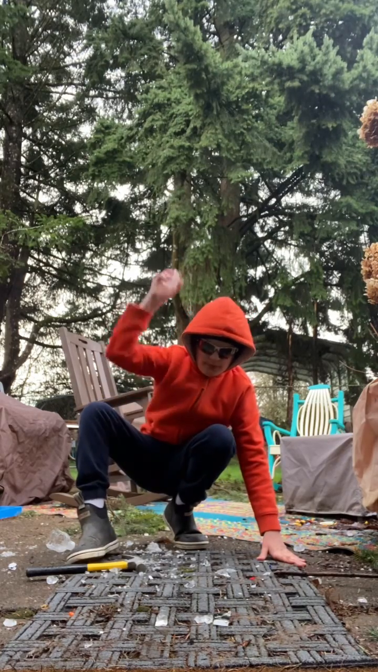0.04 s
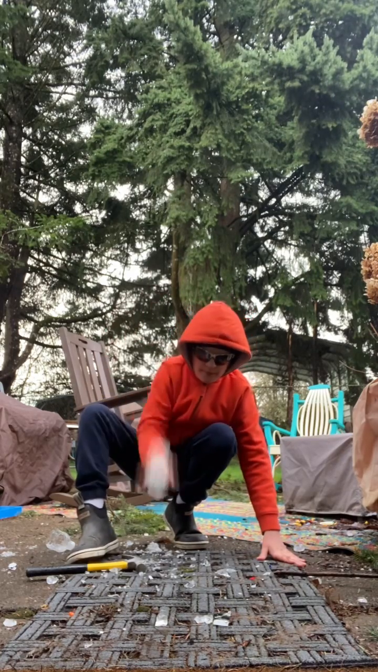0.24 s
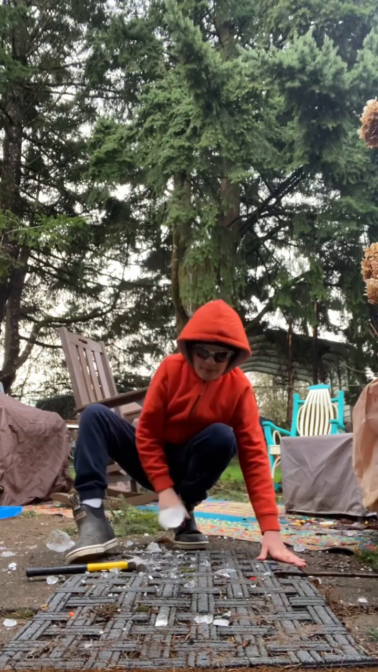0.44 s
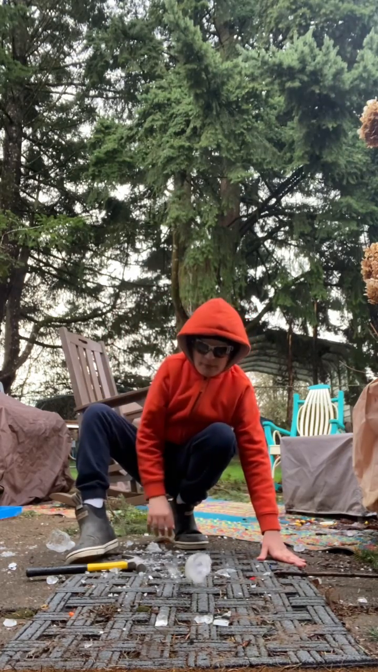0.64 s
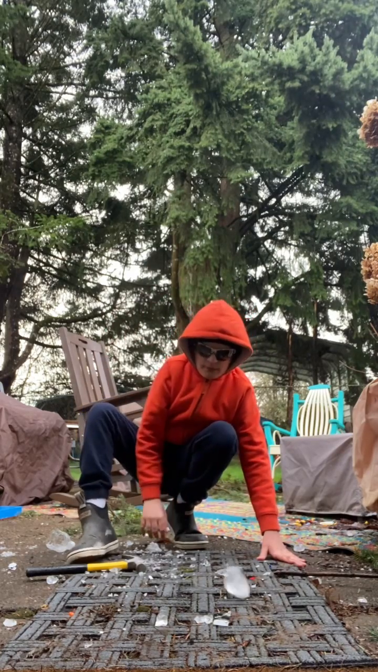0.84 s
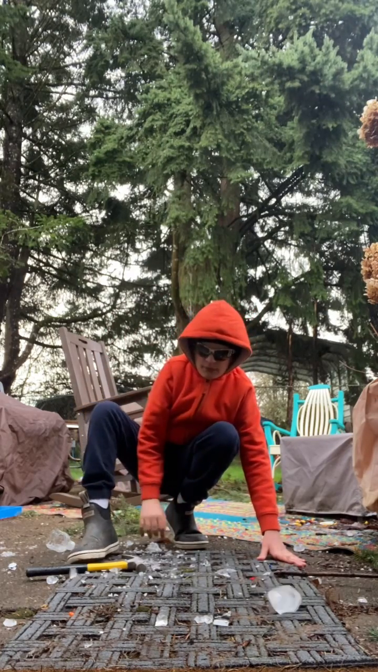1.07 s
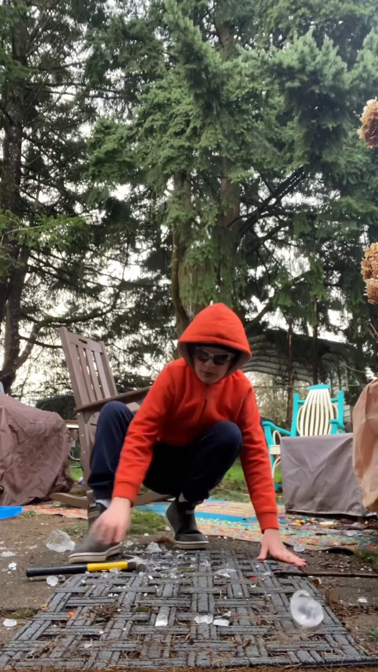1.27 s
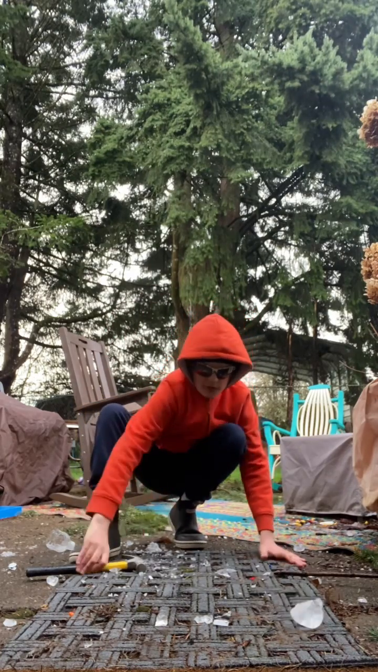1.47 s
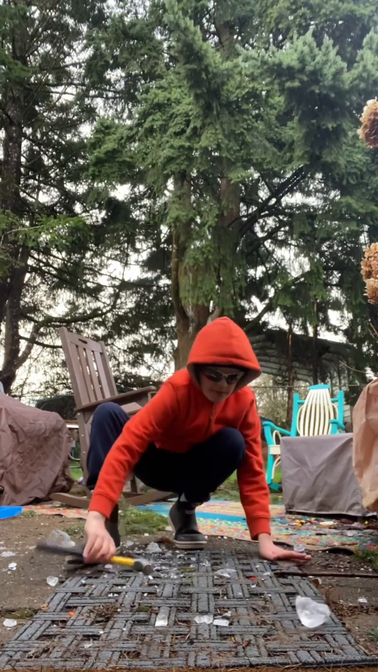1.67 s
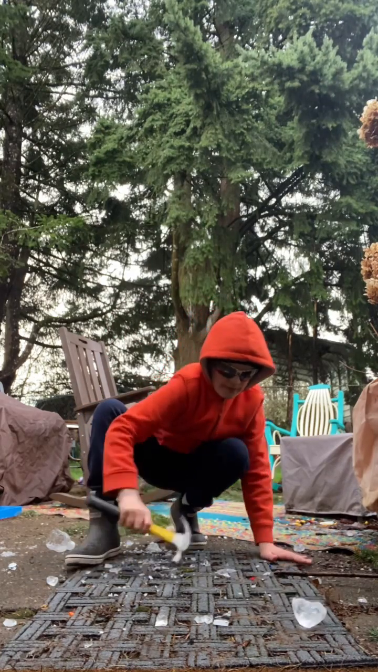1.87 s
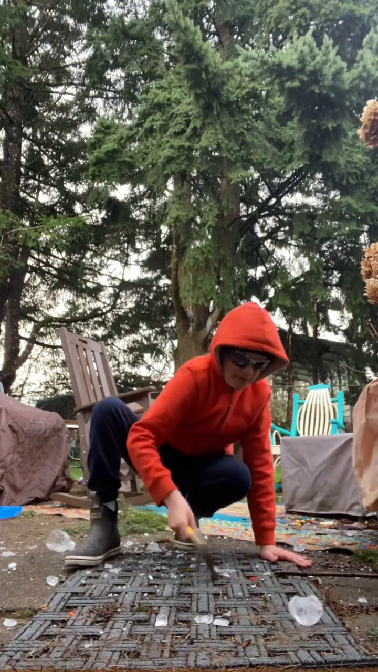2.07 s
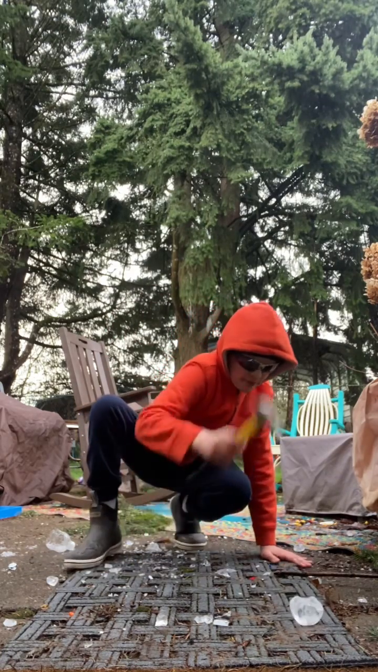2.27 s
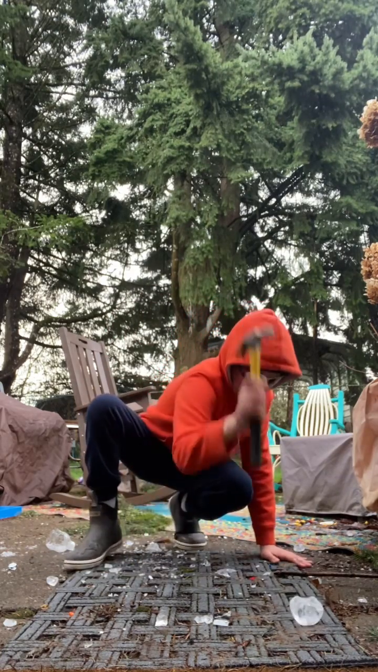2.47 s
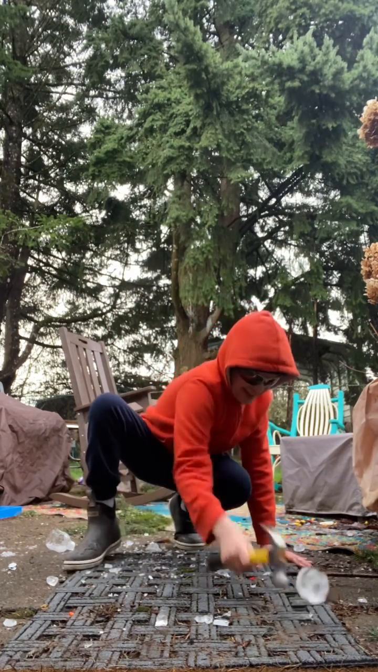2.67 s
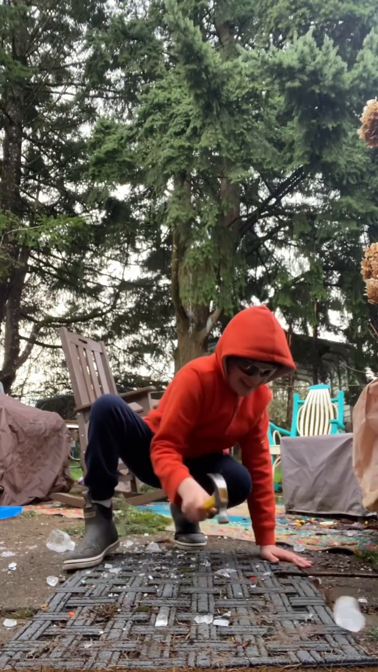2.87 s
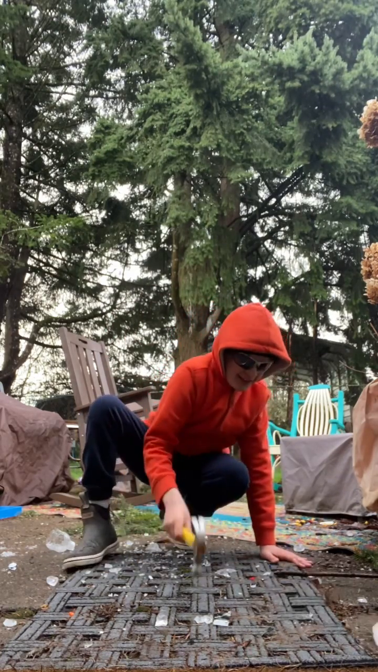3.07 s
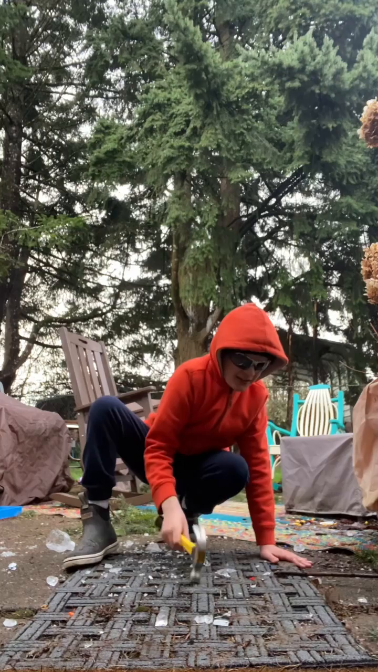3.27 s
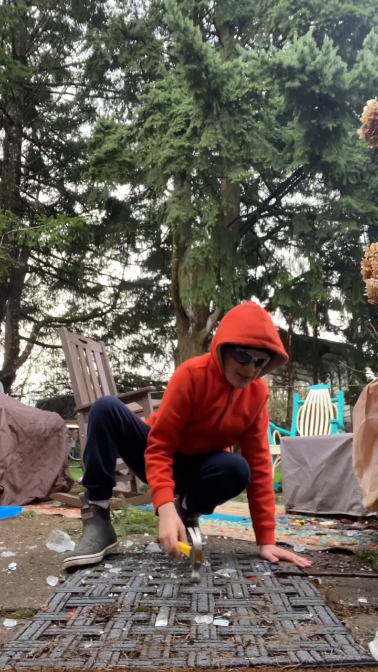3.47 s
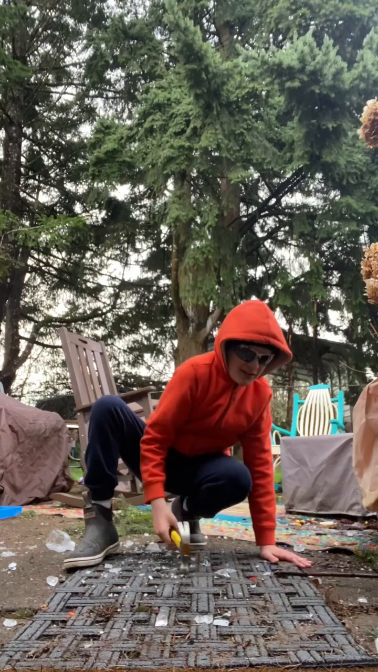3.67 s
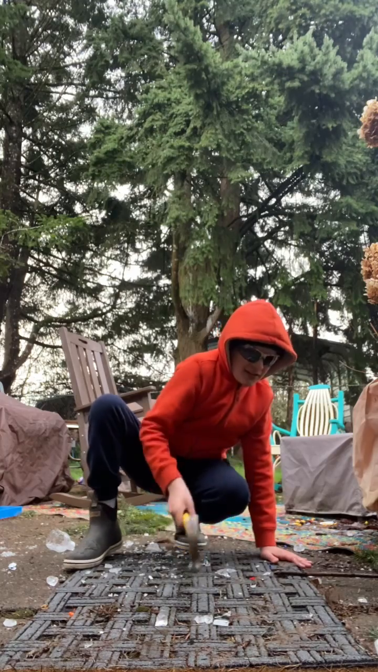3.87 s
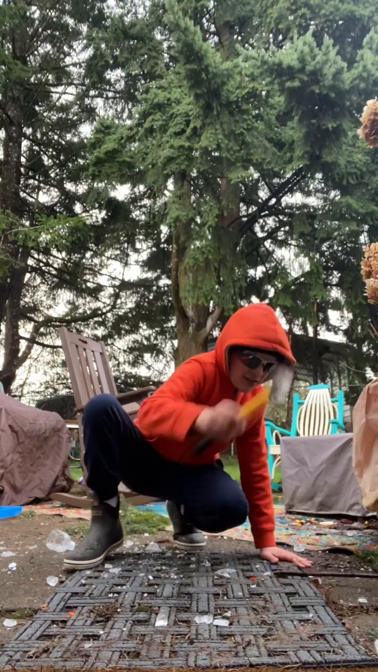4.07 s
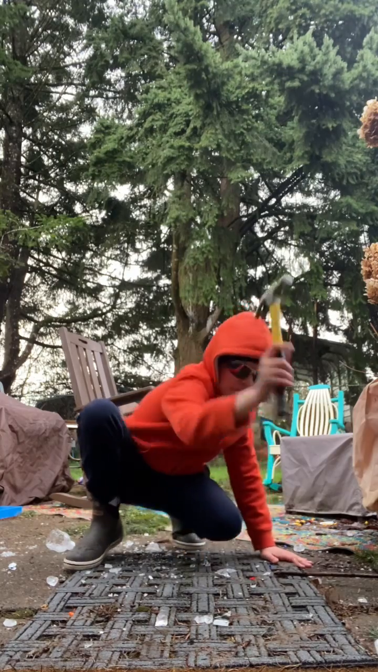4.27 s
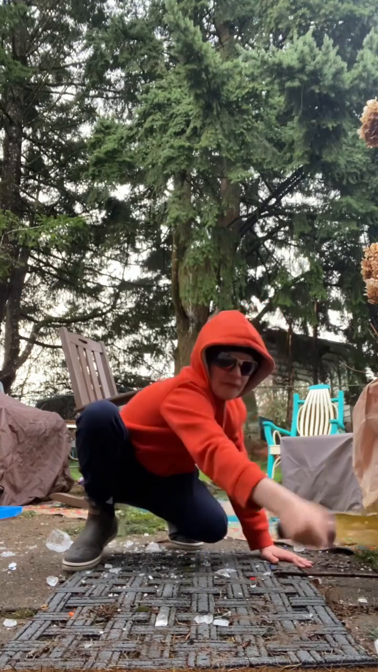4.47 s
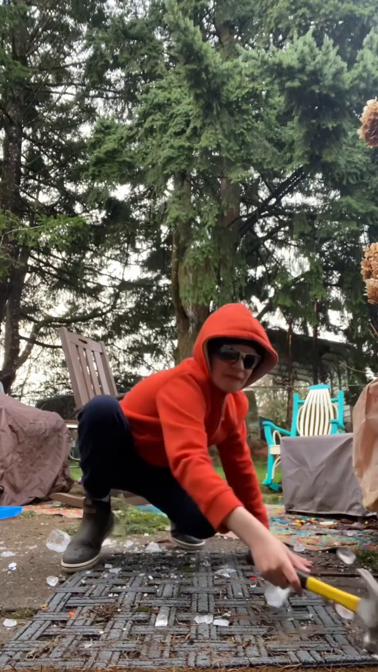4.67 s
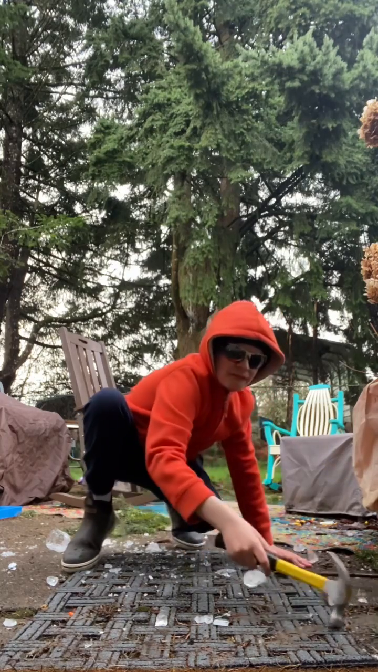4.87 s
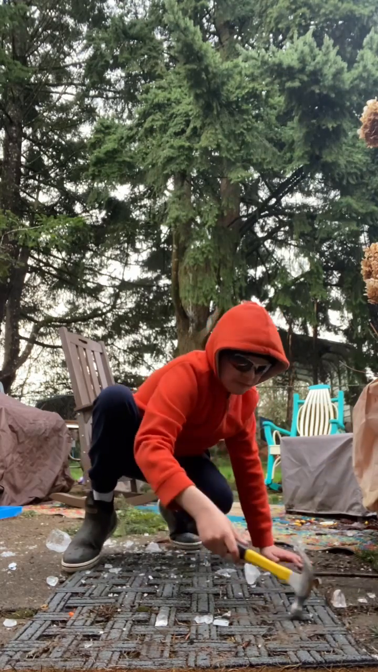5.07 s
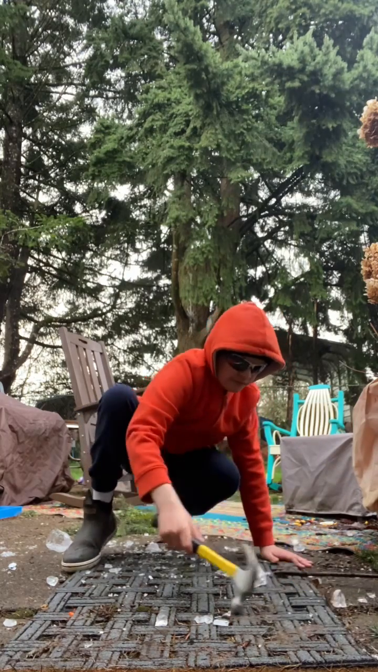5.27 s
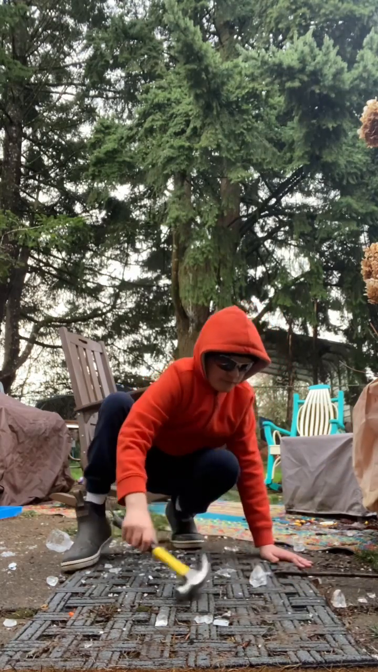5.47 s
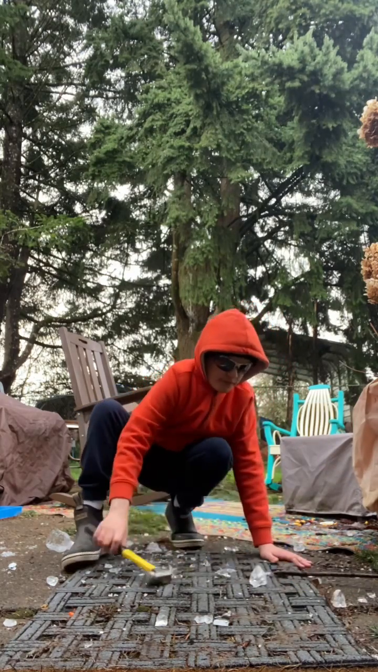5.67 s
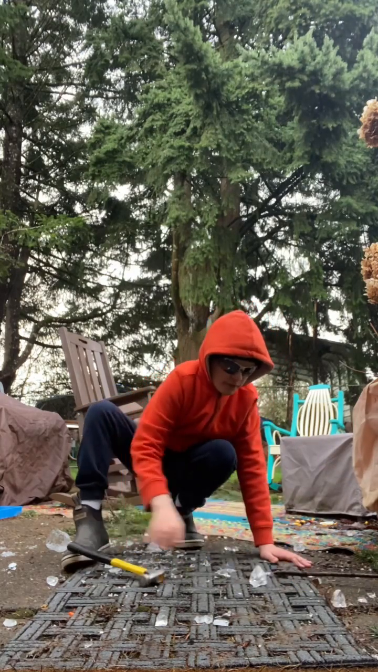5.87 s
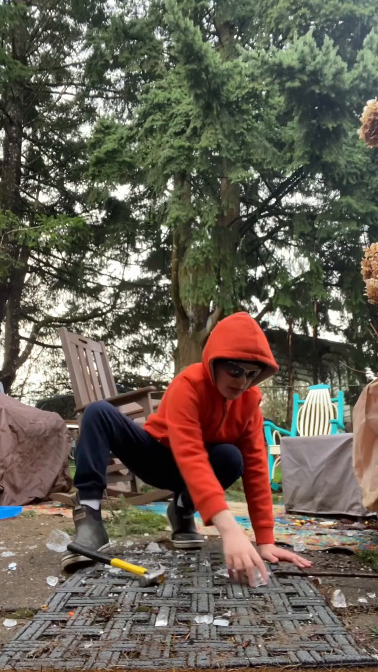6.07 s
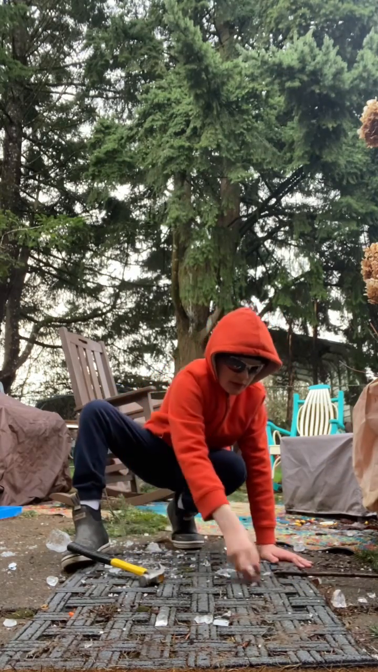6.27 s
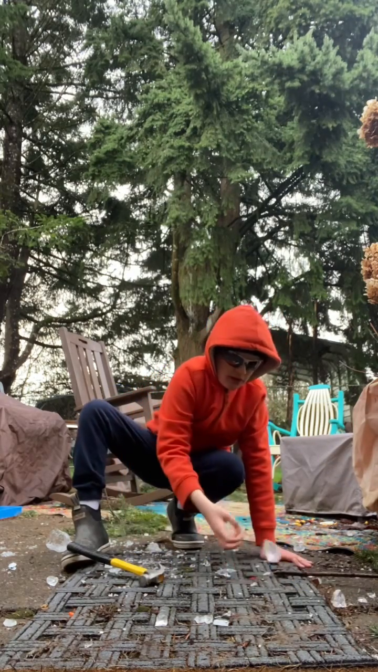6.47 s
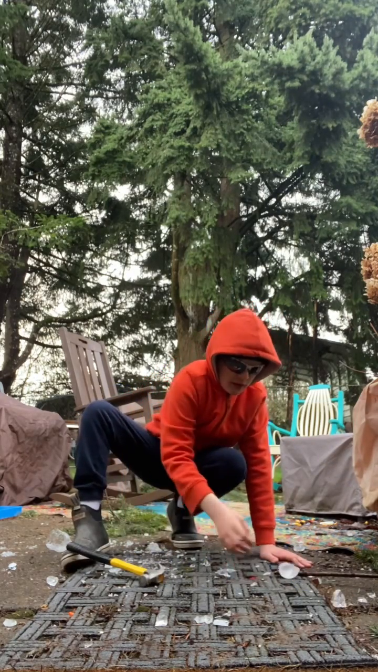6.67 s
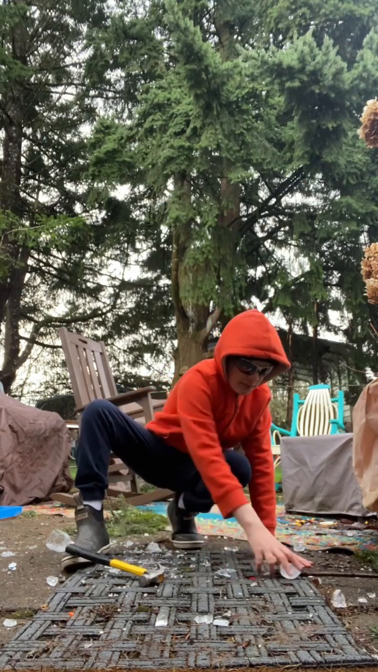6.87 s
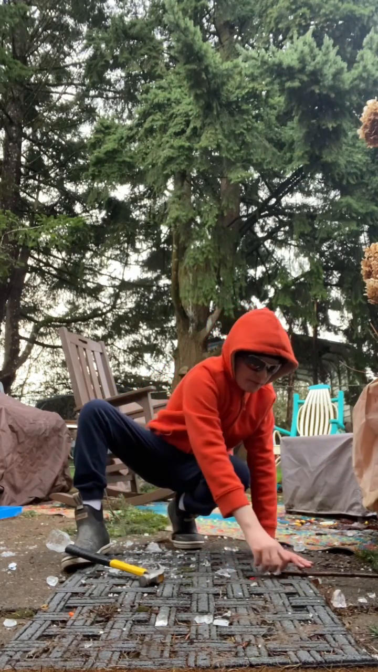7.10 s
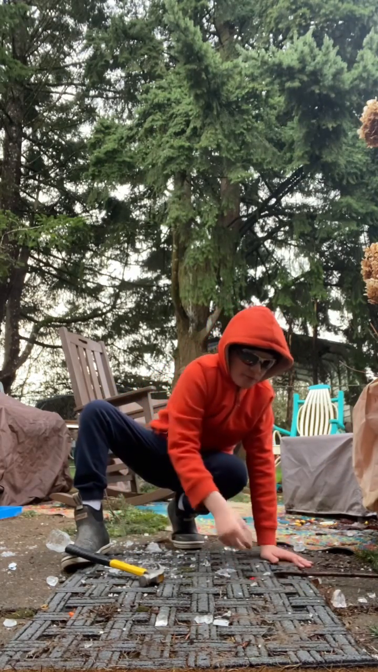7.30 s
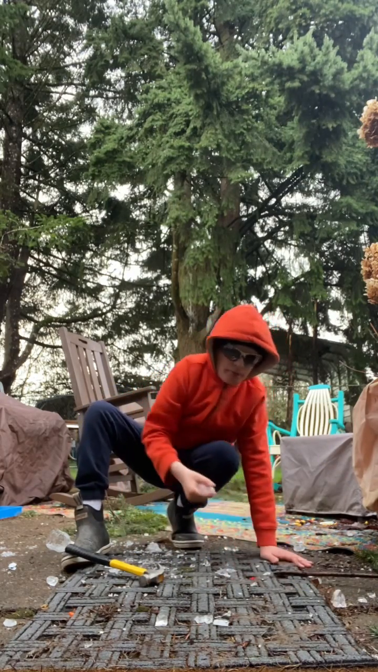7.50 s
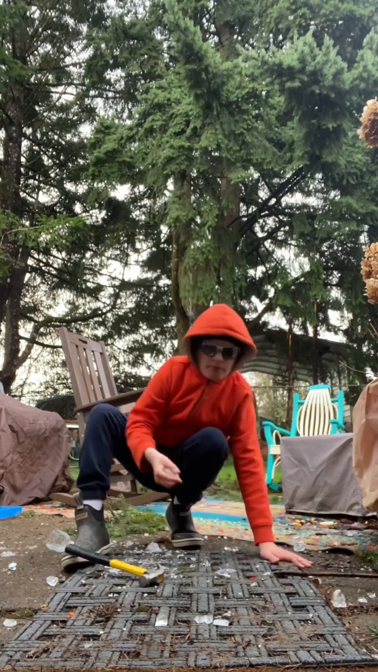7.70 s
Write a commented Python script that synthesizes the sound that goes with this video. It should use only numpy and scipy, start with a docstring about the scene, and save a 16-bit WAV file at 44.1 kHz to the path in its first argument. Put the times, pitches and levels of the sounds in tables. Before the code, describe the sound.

Ice snaps hard on a woven mat, knocks a few times and rolls off. After a pause with thin bird chirps, a heavy crunching hammer blow lands, then loose knocks, then another splintering blow followed by rattling shards and dragging scrapes. The tool is set down with a low thump. A thrush sings in phrases behind; faint town rumble, stereo microphones close by, little echo.

```python
"""A lump of ice is thrown on a mat in a garden and bounces away; then a hammer smashes ice twice.
Each blow excites a ground thud, a damped body tone, a crack and splinters with a snap and random fractures.
The steel head rings as dying sines; pieces knock, skip, scrape and rattle; grit ticks as it is shifted.
Birds sing as gliding sines smeared by echoes, over filtered-noise traffic, town hush and an engine hum.
Two microphone ports stand close by, differing in level and phase."""
import sys
import numpy as np
from scipy import signal
from scipy.fft import rfft, irfft, next_fast_len
from scipy.io import wavfile
from scipy.ndimage import map_coordinates

SR = 44100
rng = np.random.default_rng(int(sys.argv[2]) if len(sys.argv) > 2 else 0)


def unload_wav(signal):
    """Save mono or channel-first audio to the path in sys.argv[1] as 16-bit WAV at rate SR, clipped to [-1, 1]."""
    wavfile.write(
        sys.argv[1],
        SR,
        np.round(np.clip(np.atleast_2d(signal).T, -1, 1) * 32767).astype(np.int16),
    )


N = 341418  # samples
BURST_S = .02  # span over which a burst's energy is rated
EDGE_HZ = 16000  # band limit

# Distant traffic: start_s, level_db
TRAFFIC = [(0.0, -50.5), (5.07, -52.5), (5.35, -46.5), (6.16, -50.5), (7.0, -51), (7.3, -49.5),
           (7.74, -50.5)]
# Spectrum of the traffic: freq_hz, gain_db
RUMBLE_SPECTRUM = [(20, -27), (40, -4), (62, 2.5), (90, 2), (125, -2.5), (200, -5), (400, -14.5),
                   (900, -40.5)]
# Spectrum of the air over town and trees: freq_hz, gain_db
AIR_SPECTRUM = [(100, -10), (250, -10), (450, 2.5), (800, -4), (1250, -8.5), (1650, -4.5), (2150, -1.5),
                (2700, -5), (3600, -12), (6000, -21), (11000, -67), (14000, -55)]
# Sleeves, boots and grit being shifted: start_s, level_db
SCUFF = [(0, -62.5), (.4, -68.5), (1.4, -57.5), (2.0, -66.5), (2.55, -67), (2.75, -60), (3.3, -68.5),
         (3.79, -55.5), (3.88, -80), (4.06, -55), (4.42, -65), (4.58, -52), (5.1, -58), (5.35, -54.5),
         (5.9, -59.5), (6.5, -63.5), (7.0, -68), (7.74, -73)]
# Spectrum of the grit: freq_hz, gain_db
GRIT_SPECTRUM = [(200, -26), (500, 9.5), (1200, 6), (2200, 18.5), (3500, -2), (8000, 0.5), (11300, -1.5),
                 (12600, -26), (16000, -62)]
# Crumbs set rattling by the rolling lump, the two smashes and the drag: peak_s, level_db
SPILLS = [(1.33, -65), (2.7, -57.5), (4.58, -52.5), (5.25, -53.5)]
SPILL_RISE_DB_PER_S, SPILL_FADE_DB_PER_S, CRUMBS_REST_DB = 65, 10.5, -64.5
# Loudness of crumbs by pitch: pitch_hz, gain_db
CRUMBS = [(650, -4), (2100, 4.5), (3600, -3), (8000, -10)]
# Heavy contacts, several to a blow:
# start_s, thud_db, body_db, crack_db, splinter_db, body_pitch_hz, crush_s
BLOWS = [(0.2912, -46, -24, -20.5, -50, 1090, 0.0014), (0.2953, -39, -23, -18.5, -45, 1203, 0.0009),
         (2.6148, -34, -19.5, -22, -31.5, 770, 0.0016), (2.6225, -26, -25.5, -26, -36.5, 720, 0.0038),
         (2.6285, -28, -26.5, -22, -35.5, 615, 0.0012), (4.5035, -38, -23.5, -20, -27, 770, 0.00042),
         (4.5088, -38, -25, -36, -41, 830, 0.0018), (4.5285, -36, -27.5, -22.5, -35.5, 720, 0.0013)]
# Spectrum of the ground's thud: freq_hz, gain_db
THUD_SPECTRUM = [(25, -42), (60, 5.5), (165, 6), (400, -19.5), (800, -39)]
# Spectrum of cracking ice: freq_hz, gain_db
CRACK_SPECTRUM = [(600, -40), (1100, 0), (1400, -0.5), (1700, -0.5), (2100, 7.5), (2550, -1.5),
                  (3000, -15.5), (3700, -48.5), (7000, -33), (11000, -41), (15000, -59)]
# Spectrum of splinters: freq_hz, gain_db
SPLINTER_SPECTRUM = [(1500, -62), (3000, 3.5), (4800, 4.5), (6500, 8.5), (8300, 8), (12000, 8.5),
                     (14000, -6), (16000, -81)]
# A lump collapsing into fragments: start_s, level_db
CRUNCHES = [(0.299, -34.5), (0.632, -39.5), (2.622, -28.5), (4.505, -33), (4.53, -35.5)]
# Spectrum of the collapse: freq_hz, gain_db
CRUNCH_SPECTRUM = [(100, -19), (350, 0.5), (1200, -0.5), (2300, 6.5), (3300, -14), (8000, -44),
                   (15000, -24)]
# The mat pressed down: start_s, peak_db, pitch_hz
THUMPS = [(0.3, -28.5, 89), (0.637, -30.5, 126), (2.626, -9, 145), (3.121, -30, 84), (3.299, -36.5, 76.5),
          (4.507, -29, 143), (4.533, -22.5, 160), (5.754, -22.5, 173)]
# A small bird's thin warble: start_s, start_hz, end_hz, level_db
CHIRPS = [(0.474, 4970, 4100, -62), (0.904, 5300, 4900, -65.5), (1.129, 4520, 3540, -58),
          (1.423, 5470, 6420, -62.5), (1.612, 3410, 4100, -56), (1.844, 6630, 7300, -65.5),
          (1.936, 6560, 7070, -69), (2.098, 6370, 5660, -64), (2.429, 5200, 3970, -61.5),
          (6.291, 6530, 6750, -71), (7.02, 3760, 3160, -64.5)]
CHIRP_S = 0.081
# Lumps and the hammer knocking on the mat: start_s, body_db, hardness_db (crack over body), body_pitch_hz
KNOCKS = [(0.6262, -51, 6.5, 910), (0.6291, -35.5, 1.5, 1340), (0.632, -40, -9, 606),
          (0.774, -43, -5.5, 540), (0.786, -47.5, -1.5, 670), (1.212, -52.5, -5, 580),
          (1.467, -53, -3.5, 800), (1.78, -54, 5.5, 910), (2.838, -66.5, 13.5, 1160),
          (2.85, -43.5, 0.5, 620), (2.908, -47.5, 5, 447), (3.114, -44, -2, 464), (3.293, -51.5, -1.5, 420),
          (4.208, -52.5, -2.5, 470), (4.692, -39.5, -1, 814), (5.521, -50, 4.5, 615), (5.753, -40, -8, 420)]
# Lower knocks are heavier and thud more: at EVEN_HZ thud and body have equal level
EVEN_HZ, THUD_DB_PER_OCTAVE = 520, 6
# Knock splinters: level against the body at zero hardness; dB gained per dB of hardness
SPRAY_DB, SPRAY_GROWTH = -9, 2.4
# The thrown lump bouncing away whole: start_s, level_db, pitch_hz, t60_s
BOUNCES = [(0.7745, -42, 1050, .007), (0.853, -36.5, 520, .015), (1.028, -42.5, 950, .011)]
# The brightest chips landing or snapping: start_s, level_db
CHIPS = [(2.954, -57.5), (3.7738, -63), (4.783, -58), (5.4474, -54), (5.5018, -67), (6.147, -54.5),
         (6.658, -63.5), (6.7192, -54.5)]
# Spectrum of a chip: freq_hz, gain_db
CHIP_SPECTRUM = [(1500, -59), (4000, -12), (7000, 7.5), (10500, 0.5), (13000, 1), (16000, -20)]
# Short pings with a pitch, one just ahead of the last blow: start_s, pitch_hz, level_db
PINGS = [(1.127, 2680, -35), (1.704, 2720, -35.5), (4.5009, 2620, -15), (4.693, 9900, -31.5),
         (4.998, 9840, -37.5)]
# A distant bird's long buzzy calls: start_s, length_s, pitch_hz, level_db
CALLS_FAR = [(1.289, 0.12, 2135, -55.5), (2.905, 0.3, 2060, -51.5)]
# The hammer head set ringing: start_s, level_db
RINGS = [(2.63, -52), (4.528, -35)]
# Modes of the steel head: freq_hz, gain_db, t60_s
STEEL_MODES = [(4800, 2.5, 0.049), (6040, 3.5, 0.19)]
# Steel and ice catching as they are dragged over the weave: start_s, crack_db
SCRAPES = [(4.602, -40.5), (4.905, -46.5), (5.053, -43), (5.151, -40), (5.229, -40), (5.297, -50),
           (6.521, -47)]
# Shards skipping and nudged after the last blow: start_s, crack_db, body_pitch_hz, body_over_crack_db
SKIPS = [(4.704, -40.5, 2070, 3.5), (4.758, -41, 880, -0.5), (4.819, -44, 2200, -0.5),
         (4.861, -68, 2400, 2), (4.971, -52.5, 704, 1.5), (5.157, -48, 2220, 2), (5.2384, -49, 2130, 8),
         (5.299, -46, 2080, -10), (7.163, -60, 1680, -4)]
# A thrush's four phrases of three or four slurs: start_s, length_s, start_hz, end_hz, level_db
SLURS = [(5.557, 0.048, 3226, 2860, -45.5), (5.6, 0.056, 2840, 2718, -45), (5.64, 0.11, 2220, 2120, -53),
         (5.7, 0.063, 2380, 2487, -49), (5.972, 0.052, 1144, 2075, -45.5), (6.03, 0.041, 1956, 2234, -41.5),
         (6.06, 0.082, 2954, 3270, -50.5), (6.1, 0.085, 2630, 2547, -46), (6.615, 0.13, 2920, 3077, -50),
         (6.755, 0.041, 2480, 2487, -47), (6.765, 0.06, 2200, 2090, -48.5),
         (7.175, 0.12, 3280, 2937, -48.5), (7.23, 0.076, 2775, 2742, -43.5),
         (7.3, 0.075, 1933, 2275, -48.5)]
# A far bird's toneless rasp
RASP_S, RASP_LENGTH_S, RASP_DB = 6.27, 0.42, -54
# Spectrum of the rasp: freq_hz, gain_db
RASP_SPECTRUM = [(1200, -43), (1900, -4), (2200, 4), (2700, -9.5), (3400, -20), (4400, -15), (5500, -43)]
# Sound scattered differently into each port: freq_hz, gain_db
SCATTER_SPECTRUM = [(80, -64), (200, -3), (600, 3.5), (2200, -2.5), (4500, 6.5), (12000, -9.5)]
# The garden's tail: freq_hz, t60_s
GARDEN_T60 = [(100, 0.048), (500, 0.58), (2200, 0.3), (5000, 0.67), (12000, 0.22)]
# Level between the ports: freq_hz, left_minus_right_db
BALANCE = [(60, .5), (160, 1.2), (400, 5.5), (800, 3), (2300, 4), (4400, 1), (9000, 0)]
# Phase between the ports: freq_hz, left_lead_rad
PHASE = [(200, 0), (1000, -.35), (2000, -.85), (5000, -.8), (9000, -1.4), (13000, -2.7)]


def amp(db):
    """Decibels to gain."""
    return 10 ** (np.asarray(db) / 20)


def unit(x):
    """Scales to an energy of one."""
    return x / np.sqrt(np.sum(x ** 2, axis=-1, keepdims=True) + 1e-20)


def steady(x):
    """Scales to an rms of one."""
    return unit(x) * np.sqrt(x.shape[-1])


def read(points, hz):
    """Reads a table on a log-frequency axis."""
    f, value = np.transpose(points)
    return np.interp(np.log(hz + 1), np.log(f), value)


def follow(curve):
    """Gain at every sample from rows of start_s, level_db."""
    return amp(np.interp(np.arange(N) / SR, *np.transpose(curve)))


def add(mix, start_s, sound):
    """Mixes a sound in at start_s."""
    part = mix[max(round(start_s * SR), 0):][:len(sound)]
    part += sound[:len(part)]


def response(points, size=4096):
    """Causal impulse response with the given spectrum: minimum phase from the log gain."""
    log_gain = np.log(amp(read(points, abs(np.fft.fftfreq(size, 1 / SR)))))
    spectrum = np.exp(np.conj(signal.hilbert(log_gain)))
    return np.fft.ifft(spectrum).real[:size // 2]


def through(x, taps):
    """Convolves along time, keeping the length."""
    size = next_fast_len(x.shape[-1] + taps.shape[-1])
    return irfft(rfft(x, size) * rfft(taps, size), size)[..., :x.shape[-1]]


def wander(rate_hz, size):
    """A smooth random curve of roughly unit spread."""
    at = np.arange(size) * rate_hz / SR
    return map_coordinates(rng.standard_normal(4096), [at], order=2, mode="wrap")


def ring(modes):
    """Sum of dying sines; modes are freq_hz, level_db, t60_s."""
    t = np.arange(SR // 4) / SR
    return sum(amp(db - 60 * t / t60) * np.sin(2 * np.pi * hz * t) for hz, db, t60 in modes)


def crumble(crush_s, grains, rise_s=0, size=8192):
    """Contact force: one snap, then a dying shower of small fractures that may swell in slowly."""
    t = np.arange(size) / SR
    decay = np.exp(-t / max(crush_s, 1e-4))
    swell = 1 - np.exp(-t / max(rise_s, 1e-5))
    fractures = rng.standard_normal(size) ** 3 * decay * swell
    return (t == 0) + grains * unit(fractures)


def burst(level_db, force, taps):
    """A force rings a response; level_db rates its energy as if spread over BURST_S."""
    return amp(level_db) * np.sqrt(BURST_S * SR) * unit(through(force, taps))


def contacts(rows, body_t60_s, grains, splinter_grains, splinter_s, overtone_db=-14, rise_s=0):
    """Each contact thumps the ground, rings the lump on the mat, cracks it and sprays splinters."""
    out = np.zeros(N)
    crack, splinter = response(CRACK_SPECTRUM), response(SPLINTER_SPECTRUM)
    thud = response(THUD_SPECTRUM, size=8192)
    for start_s, thud_db, body_db, crack_db, splinter_db, hz, crush_s in rows:
        broken = grains * crush_s / 0.00037  # the longer the crush, the more fractures outweigh the snap
        add(out, start_s, burst(thud_db, crumble(crush_s, 0.63), thud))
        body = ring([(hz, 0, body_t60_s), (2 * hz, overtone_db, body_t60_s)])
        add(out, start_s, burst(body_db, crumble(crush_s, broken, rise_s), body))
        add(out, start_s, burst(crack_db, crumble(crush_s, broken, rise_s), crack))
        spray = crumble(crush_s + splinter_s, splinter_grains * broken, rise_s)
        add(out, start_s, burst(splinter_db, spray, splinter))
    return out


def tail(t60s, rise_s):
    """A diffuse echo for each port: noise whose bands each die at their own speed."""
    hz, t, z = signal.stft(rng.standard_normal((2, SR)), SR, nperseg=256)
    decay = amp(-60 * t / read(t60s, hz)[:, None])
    z = z * decay * (1 - np.exp(-t / rise_s))
    return unit(signal.istft(z, SR, nperseg=256)[1])


def whistle(length_s, start_hz, end_hz, rough, settle=2.1, overtone_db=-60):
    """A note slides quickly, then settles on its end pitch; rough is the share by which the pitch quivers."""
    u = np.linspace(0, 1, int(length_s * SR))
    quiver = rough * (wander(700, len(u)) + wander(90, len(u)))
    glide_hz = end_hz + (start_hz - end_hz) * (1 - u) ** settle
    swell = signal.windows.tukey(len(u), .3) * amp(0.47 * wander(63.0, len(u)))
    phase = 2 * np.pi * np.cumsum(glide_hz * (1 + quiver)) / SR
    return steady(swell * (np.sin(phase) + amp(overtone_db) * np.sin(2 * phase)))


def trees(x, direct, t60_s):
    """A far sound arrives directly and as a smear of echoes from the trees."""
    return direct * x + through(x, tail([(2000, t60_s), (7000, 0.99 * t60_s)], rise_s=0.00071))


def background():
    """Traffic rumble, alike at both ports, under a diffuse hush of town and trees."""
    rumble = steady(through(rng.standard_normal(N), response(RUMBLE_SPECTRUM)))
    rumble = rumble * follow(TRAFFIC) * amp(1.7 * wander(7, N))
    hush = rng.standard_normal((2, N)) + 0.5 * rng.standard_normal(N)  # partly shared by the ports
    hush = steady(through(hush, response(AIR_SPECTRUM))) * amp(0.16 * wander(11.0, N))
    return rumble + amp(-57.0) * hush


def drone(pitch_hz=124, level_db=-58):
    """A far engine hums, unsteady in level and pitch."""
    waver_db = 2.2 * wander(6, N)
    turns = np.cumsum(pitch_hz * (1 + 0.0238 * wander(6.4, N))) / SR
    return amp(level_db + waver_db) * np.sin(2 * np.pi * turns)


def scuff():
    """Fine grit ticks under hands and boots: random clicks of uneven size and patchy loudness."""
    patchy_db, size_db, clicks_per_s = 3.4, 3.8, 3000
    sizes = amp(size_db * np.minimum(rng.exponential(1, N), 5.5))
    clicks = sizes * rng.standard_normal(N) * (rng.random(N) < clicks_per_s / SR)
    grit = through(clicks, response(GRIT_SPECTRUM)) * amp(patchy_db * wander(40, N))
    return follow(SCUFF) * steady(grit)


def debris(ring_share=0.54, ring_t60_s=0.0089, kinds=12):
    """Crumbs land at random, each kind with its own short ring; each spill flares up and settles."""
    t = np.arange(N) / SR
    landings_per_s, size_db = 110, 1.0
    spills_db = [db - np.maximum((s - t) * SPILL_RISE_DB_PER_S, (t - s) * SPILL_FADE_DB_PER_S)
                 for s, db in SPILLS]
    level = amp(np.maximum(np.max(spills_db, axis=0), CRUMBS_REST_DB))
    sizes = amp(size_db * np.minimum(rng.exponential(1, N), 3))
    landings = sizes * rng.choice([-1, 1], N) * (rng.random(N) < landings_per_s / SR)
    kind, crack, out = rng.integers(0, kinds, N), unit(response(CRACK_SPECTRUM)), np.zeros(N)
    for k, hz in enumerate(np.geomspace(CRUMBS[0][0], CRUMBS[-1][0], kinds)):
        note = unit(ring([(hz, 0, ring_t60_s)]))[:len(crack)]
        tap = amp(read(CRUMBS, hz)) * (ring_share * note + .5 * crack)
        out += through(landings * (kind == k), tap)
    return level * steady(out)


def blows():
    """Ice gives way under the throw and the hammer, too broken to ring."""
    return contacts(BLOWS, body_t60_s=.0055, overtone_db=-1.0, grains=.4,
                    splinter_grains=4.1, splinter_s=0.0018)


def crunches(rise_s=0.00067, fade_s=0.018, fragments_per_s=1500):
    """Behind the snap the lump collapses in a dense shower of fragments."""
    out, t = np.zeros(N), np.arange(8192) / SR
    envelope = (1 - np.exp(-t / rise_s)) * np.exp(-t / fade_s)
    for start_s, db in CRUNCHES:
        fragments = rng.standard_normal(len(t)) * (rng.random(len(t)) < fragments_per_s / SR)
        add(out, start_s, burst(db, fragments * envelope, response(CRUNCH_SPECTRUM)))
    return out


def thumps(swell_cycles=0.56, sag=0.14, sag_s=0.01):
    """The mat is pressed into the ground and springs back: a few low swings that fall in pitch."""
    out, t = np.zeros(N), np.arange(8192) / SR
    for start_s, db, hz in THUMPS:
        u = t * hz / swell_cycles
        turns = np.cumsum(hz * (1 + sag * np.exp(-t / sag_s))) / SR
        add(out, start_s, amp(db) * u * np.exp(1 - u) * np.sin(2 * np.pi * turns))
    return out


def warbler():
    """A small bird strings short, thin notes together."""
    out = np.zeros(N)
    for start_s, start_hz, end_hz, db in CHIRPS:
        add(out, start_s, amp(db) * whistle(CHIRP_S, start_hz, end_hz, rough=.022))
    return trees(out, direct=0.74, t60_s=.65)


def knocks(crush_s=0.0033):
    """Light contacts hardly crush the ice: heavy ones thud, hard ones crack and splinter."""
    rows = []
    for start_s, db, hard_db, hz in KNOCKS:
        thud_db = db + THUD_DB_PER_OCTAVE * np.log2(EVEN_HZ / hz)
        splinter_db = db + SPRAY_DB + SPRAY_GROWTH * hard_db
        rows.append((start_s, thud_db, db, db + hard_db, splinter_db, hz, crush_s))
    return contacts(rows, body_t60_s=.008, overtone_db=-38.0, grains=0.22,
                    splinter_grains=1.0, splinter_s=0.00048)


def bounces(click_db=-13, thud_db=-11):
    """The whole lump bounces on the mat: each knock slides down to a hollow note as the weave gives."""
    strike_hz, glide_s, rise_s = 2000, .0009, .001
    out, t = np.zeros(N), np.arange(8192) / SR
    for start_s, db, hz, t60_s in BOUNCES:
        turns = np.cumsum(hz + (strike_hz - hz) * np.exp(-t / glide_s)) / SR
        note = (1 - np.exp(-t / rise_s)) * amp(-60 * t / t60_s) * np.sin(2 * np.pi * turns)
        snap = crumble(crush_s=.001, grains=.1)
        add(out, start_s, burst(db, snap, note))
        add(out, start_s, burst(db + click_db, snap, response(CRACK_SPECTRUM)))
        add(out, start_s, burst(db + thud_db, snap, response(THUD_SPECTRUM)))
    return out


def chips(stray_db=-67, count=9):
    """Bright ticks of tiny pieces, faint strays at random after the first contact."""
    out, tick = np.zeros(N), response(CHIP_SPECTRUM)
    strays = [(s, stray_db) for s in rng.uniform(BLOWS[0][0], N / SR, count)]
    for start_s, db in list(CHIPS) + strays:
        add(out, start_s, burst(db, crumble(crush_s=0.0039, grains=1.0), tick))
    return out


def pings():
    """Short pitched pings: single sines that die within a few hundredths of a second."""
    out = np.zeros(N)
    for start_s, hz, db in PINGS:
        add(out, start_s, ring([(hz, db, .021)]))
    return out


def far_caller(sag=0.022):
    """A distant bird holds hoarse notes that sag a little."""
    out = np.zeros(N)
    for start_s, length_s, hz, db in CALLS_FAR:
        note = whistle(length_s, hz, hz * (1 - sag), rough=.04, overtone_db=-18.0)
        add(out, start_s, amp(db) * note)
    return trees(out, direct=0.79, t60_s=0.31)


def hammer_head():
    """The steel rings briefly in its own modes where it meets the ground."""
    out = np.zeros(N)
    for start_s, db in RINGS:
        add(out, start_s, amp(db) * ring(STEEL_MODES))
    return out


def scrapes(pitch_hz=590, thud_db=-12, body_db=-12, splinter_db=-16, crush_s=0.0044):
    """A drag builds up through many small slips."""
    rows = [(s, db + thud_db, db + body_db, db, db + splinter_db, pitch_hz, crush_s) for s, db in SCRAPES]
    return contacts(rows, body_t60_s=0.0064, grains=1.2, splinter_grains=2.2,
                    splinter_s=0.0046, rise_s=0.0065)


def skips(thud_db=-24, splinter_db=-17, crush_s=.0008):
    """Light shards give one dry, sharp click at each landing."""
    rows = [(s, db + thud_db, db + body_db, db, db + splinter_db, hz, crush_s)
            for s, db, hz, body_db in SKIPS]
    return contacts(rows, body_t60_s=0.0087, overtone_db=-24.0, grains=.25,
                    splinter_grains=4.0, splinter_s=.002)


def thrush():
    """A thrush carols in short phrases of slightly hoarse slurs, some overlapping."""
    out = np.zeros(N)
    for start_s, length_s, start_hz, end_hz, db in SLURS:
        add(out, start_s, amp(db) * whistle(length_s, start_hz, end_hz, rough=.018, settle=1.8))
    return trees(out, direct=.4, t60_s=0.56)


def rasp():
    """One far call is so hoarse that it has no clear pitch: a burst of filtered noise."""
    out, size = np.zeros(N), int(RASP_LENGTH_S * SR)
    noise = through(rng.standard_normal(N), response(RASP_SPECTRUM))[:size]
    add(out, RASP_S, amp(RASP_DB) * steady(noise * signal.windows.tukey(size, .4)))
    return trees(out, direct=1.0, t60_s=1.0)


def bend(x, lag_s=0.00436, corner_hz=300):
    """Bending waves in the mat carry the bass more slowly, so each knock sweeps downward."""
    size = next_fast_len(N + 4096)
    hz = np.fft.rfftfreq(size, 1 / SR)
    turns = lag_s * corner_hz * np.log1p(hz / corner_hz)
    return irfft(rfft(x, size) * np.exp(-2j * np.pi * turns), size)[:N]


def patio(x, scatter_db, tail_db, echo_s=0.0026, echo=0.15):
    """A close reflection, scatter off the furniture, then the faint tail of the garden."""
    near = x + echo * np.interp(np.arange(N) - echo_s * SR, np.arange(N), x, left=0)
    smear = tail([(200, 0.14), (2000, 0.08), (9000, 0.15)], rise_s=0.00029)
    scatter = through(through(x, response(SCATTER_SPECTRUM)), smear)
    garden = through(x, tail(GARDEN_T60, rise_s=0.031))
    return near + amp(scatter_db) * scatter + amp(tail_db) * garden


def scene():
    """Ice and hammer on the patio; birds and town behind."""
    behind = background() + drone() + warbler() + far_caller() + thrush() + rasp()
    heavy = bend(blows() + crunches()) + thumps()
    light = bend(debris() + knocks() + scrapes() + skips()) + scuff() + bounces() + chips() + pings()
    heavy = patio(heavy, scatter_db=-2.0, tail_db=-24.0)
    light = patio(light, scatter_db=-4.0, tail_db=-19.0)
    return behind + heavy + light + hammer_head()


def record(dry):
    """The ports differ in level and phase and shed deep bass; peaks are rounded off; then the band limit."""
    size = next_fast_len(N + 4096)
    hz = np.fft.rfftfreq(size, 1 / SR)
    half = amp(read(BALANCE, hz) / 2) * np.exp(.5j * read(PHASE, hz))  # half the difference to each port
    ports = irfft(rfft(dry, size) * np.array([half, 1 / half]), size)[:, :N]
    ports = signal.sosfilt(signal.butter(3, 42, "high", fs=SR, output="sos"), ports)
    low_pass = signal.firwin(255, EDGE_HZ, window=("kaiser", 9), fs=SR)
    return signal.oaconvolve(np.tanh(ports), low_pass[None], "same")


dry = scene()
out = record(dry)
unload_wav(out)
```